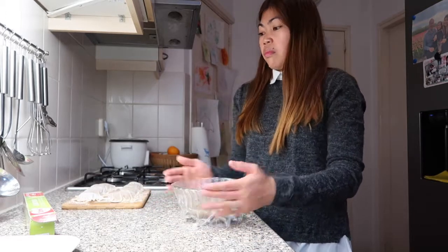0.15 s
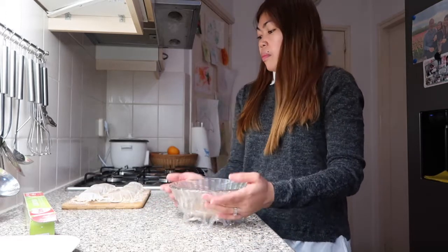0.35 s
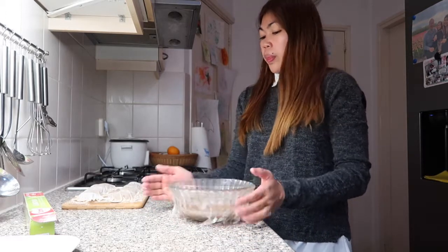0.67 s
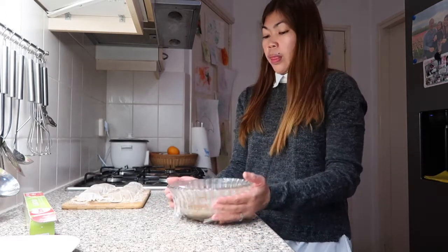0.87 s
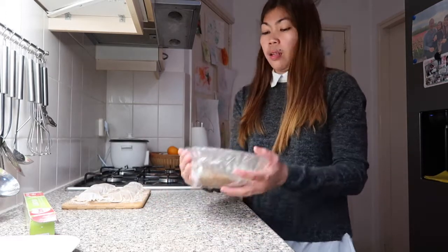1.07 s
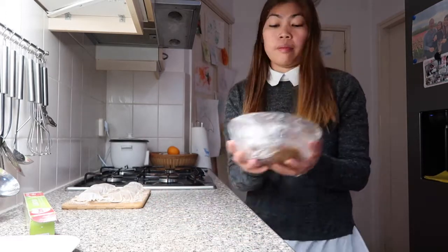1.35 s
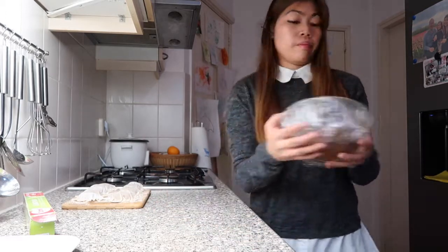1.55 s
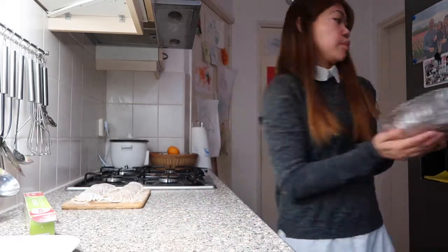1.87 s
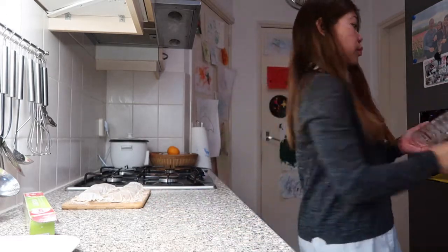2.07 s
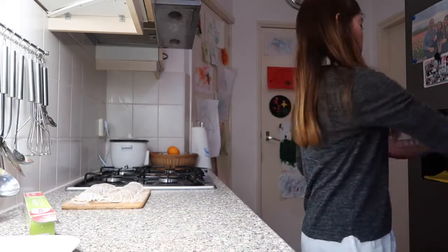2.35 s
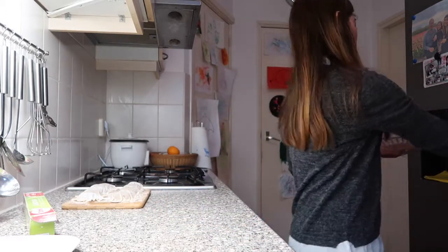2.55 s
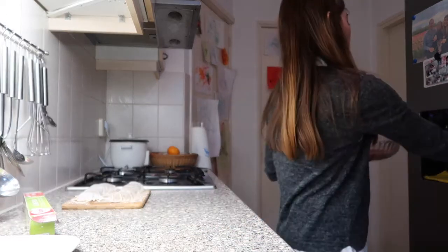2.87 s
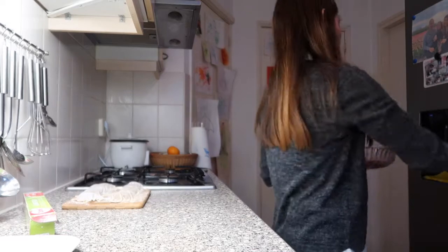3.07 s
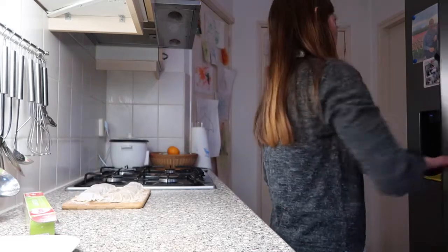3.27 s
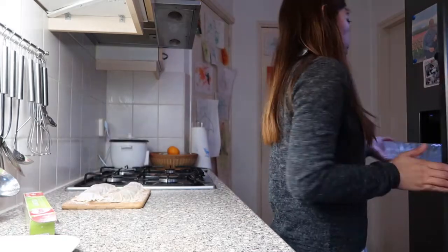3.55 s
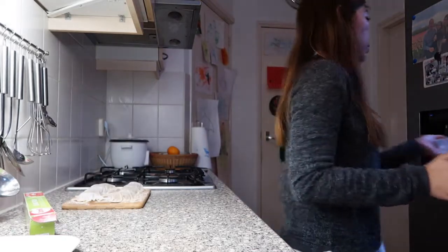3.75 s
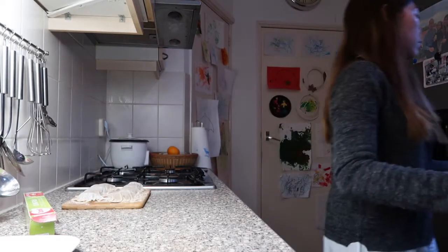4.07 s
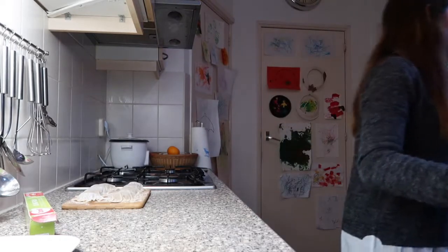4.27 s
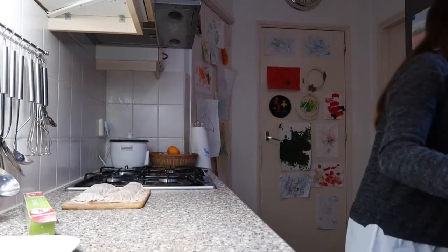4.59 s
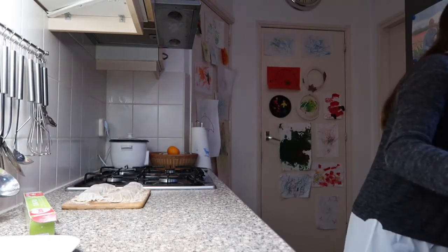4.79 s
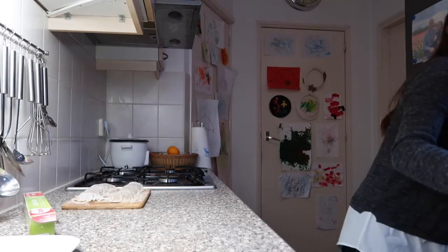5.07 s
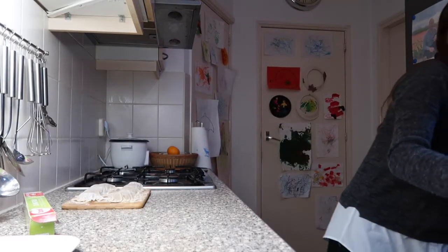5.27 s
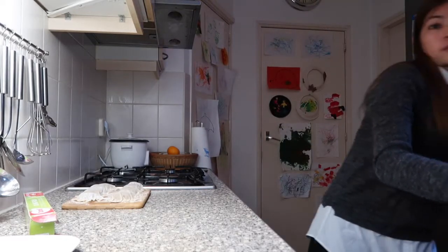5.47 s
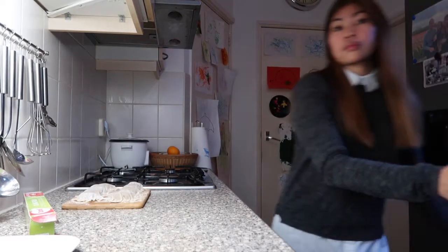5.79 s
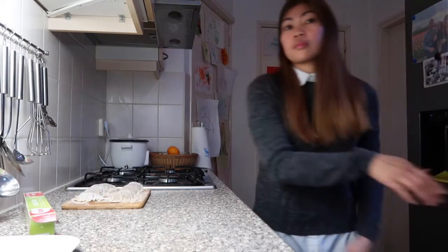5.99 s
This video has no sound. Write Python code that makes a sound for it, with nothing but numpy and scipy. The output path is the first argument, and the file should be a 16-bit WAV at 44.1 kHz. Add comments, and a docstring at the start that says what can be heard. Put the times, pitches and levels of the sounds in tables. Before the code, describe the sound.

Hard bowl taps in a tiled kitchen, then crinkling film, a tearing door seal with knocks and faint hinge groans, and a glassy shelf clatter.

```python
"""Bowl into the refrigerator

A film-covered glass bowl is tapped on a stone counter in a tiled kitchen and carried to the refrigerator: the
door seal tears and pops, dishes slide, and the bowl lands on a shelf and is pushed home. Blows are short bursts
ringing resonances or damped modes; film, clothes and air are swelling coloured noise; the hinge groans in narrow
bands. A hum lies under it all, and blows, snaps and seal echo in the room around a close microphone pair."""
import sys
import numpy as np
from scipy import signal
from scipy.fft import rfft, irfft, next_fast_len
from scipy.io import wavfile
from scipy.ndimage import map_coordinates

SR = 44100
rng = np.random.default_rng(int(sys.argv[2]) if len(sys.argv) > 2 else 0)


def store_wav(level_fs):
    """Save 16-bit WAV to argv[1]."""
    pcm = np.round(np.clip(np.atleast_2d(level_fs), -1, 1) * 32767)
    wavfile.write(sys.argv[1], SR, pcm.T.astype(np.int16))


N = 270333

# Refrigerator hum over time. Each row: time in seconds, level in dB.
HUM_LEVEL = [(0, -56), (.6, -51), (1.05, -74.5), (1.2, -58.5), (1.55, -59), (1.65, -54.5), (1.95, -52),
             (2.25, -48.5), (2.7, -50), (3.1, -44), (3.5, -48.5), (3.8, -47.5), (3.9, -50), (4.2, -46),
             (4.3, -49.5), (4.75, -48.5), (5.3, -53), (5.7, -48.5), (6.13, -49.5)]
# Colours of noise. Each row: frequency in Hz, relative level in dB.
MOTOR_COLOUR = [(41, -31.5), (70, -28.5), (80, -3), (92, -7), (108, 7.5), (157, -6.5), (177, -4.5),
                (220, -8), (290, -51.5), (480, -120)]
AIR_COLOUR = [(15, -37), (25, -11.5), (111, -5), (481, -17), (658, -30), (790, -13), (1050, -29),
              (2140, -17), (9240, -32.5), (13000, -42.5), (16900, -106), (22000, -120)]  # quiet of the room
HISS_COLOUR = [(880, -15.5), (1500, -4.5), (2900, -8), (3350, -11), (3640, -9), (4810, -18), (7420, -16),
               (11400, -17), (13000, -3.5), (16900, -36), (22000, -120)]  # microphones
SLIDE_COLOUR = [(100, -48), (180, -18.5), (250, -1.5), (450, 2), (700, -9), (1000, -14), (2000, -120)]  # sliding dishes, and the murmur above the hum
SCRAPE_COLOUR = [(450, -44.5), (700, -0.5), (1100, -4.5), (1600, -4), (2300, -12.5), (4000, -120)]
RUSTLE_COLOUR = [(1000, 0), (1600, 1.5), (2500, 6), (3500, -1.5), (5000, -38.5), (8000, -120)]
CRISP_COLOUR = [(2200, -37.5), (3500, -0.5), (4300, -2), (7000, -10), (9000, -28.5), (14000, -120)]
SIZZLE_COLOUR = [(5000, -7.5), (7000, -5.5), (9000, -6.5), (11500, -16.5), (13500, -29), (20000, -120)]
PUSH_COLOUR = [(12, -39.5), (20, -10.5), (43, -0.5), (80, 5.5), (100, -36.5), (180, -120)]  # pushed air, and the rumble below the hum
CLATTER_COLOUR = [(25, -55), (60, -40), (200, -13), (700, -10), (1500, -11.5), (3000, -15.5), (5000, -26.5),
                  (8500, -42), (11000, -103)]  # loose things on the shelf, before the tilt for hardness
RUMBLE_DB, MURMUR_DB = -12, -6  # against the motor noise
AIR_DB, HISS_DB = -59, -64

# Bowl on the counter, door with its load, palms on the bowl.
# Each row: start in seconds, peak level in dB, contact hardness in dB (brightness against 1500 Hz).
BOWL_TAPS = [(-.045, -8.5, 5.5), (-.004, -13.5, -0.5), (.021, -18.5, -1), (.302, -34, -1),
             (.315, -30.5, -4), (.332, -32.5, -2.5), (.346, -34, -3), (.626, -9, -15.5), (.6412, -2, 1.5),
             (.671, -12.5, -8), (.692, 0, 2), (.7075, -23.5, -7), (.728, -5.5, 4.5), (.739, -16.5, -1.5),
             (.748, -22, -2), (.769, -27.5, 7.5), (.819, -39, -18), (.795, -25, -3), (.855, -26, -7.5),
             (.889, -21.5, -12), (.92, -31, 1)]
DOOR_KNOCKS = [(2.17, -38, -7), (2.3, -49, 11), (2.424, -35, -5), (2.608, -37, -7), (2.734, -18, 12),
               (2.759, -22.5, -4), (2.791, -28, -3), (2.822, -8.5, 6), (2.827, -11, 11.5),
               (2.831, -7.5, 10), (2.845, -25, 4), (2.856, -13, 2), (2.874, -29, 1), (2.888, -15, -0.5),
               (2.905, -19, -6), (2.919, -32, -5), (2.959, -23, -3), (3.007, -32, -8), (3.877, -25.5, -0.5),
               (3.888, -27, -10), (3.904, -35.5, -8), (3.924, -40, 0), (3.977, -31, -5), (4.003, -26.5, -3),
               (4.735, -44, -26), (5.675, -32, -2)]
PALM_PATS = [(.228, -36.5, -23), (.449, -30.5, -16), (.482, -31, -17.5), (.505, -40, -15.5)]
# Resonant bodies. Each row: centre in Hz, width in Hz, relative level in dB.
COUNTER_BODY = [(115.7, 9.3, 13), (168, 78, 0.5), (337, 25, 4.5), (452, 12, 4.5), (513, 85, 5.5),
                (520, 2.8, 6), (571, 27, 1), (618.5, 42, 9), (653, 35, 6), (765, 66, 5.5), (930, 91, 2.5),
                (1036, 144, 3), (1472, 190, 1), (2060, 190, -3), (2400, 190, -6), (3610, 860, -5)]  # bowl and slab
PADDED_BODY = [(118.2, 22, 14), (189, 55, 1), (330, 80, 2.5), (500, 90, -8), (685, 120, -8)]  # bowl and slab under the palms
PANEL_BODY = [(61.6, 5.6, 9.5), (119, 36, 12), (321, 43, 4), (410, 38, 8), (717, 350, 5), (1104, 220, 9.5),
              (1437, 166, 11), (1900, 120, 7), (2440, 610, 2)]  # door panel
REBOUND_S, REBOUND = 0.00424, 0.35  # the far rim lands after the near one: delay, gain
RADIATES_HZ = 45  # blows give little sound below this

# Dishes and door seal rubbing.
# Each row: time at full strength in seconds, rise in seconds, hold in seconds, sliding in dB, scrape in dB.
RUBS = [(.12, 0.066, 0.03, -46.5, -76), (.32, 0.11, 0.029, -43.5, -52.5), (.48, 0.17, 0.18, -61, -66),
        (.97, 0.44, 0.012, -53.5, -52.5), (1.27, 0.15, 0.028, -75, -58.5), (1.66, 0.083, 0.12, -55.5, -66),
        (2.16, 0.21, 0.078, -58, -67), (2.31, 0.088, 0.05, -71, -49.5), (2.405, 0.023, 0.025, -54, -47.5),
        (2.44, 0.058, 0.013, -47, -61), (2.6, 0.11, 0.039, -52, -48), (2.66, 0.011, .05, -52, -42.5),
        (2.74, 0.034, 0.015, -33.5, -35), (2.8, 0.019, 0.047, -30, -28.5), (3.04, 0.11, 0.3, -53.5, -53),
        (3.25, 0.16, 0.32, -60.5, -62.5), (3.9, 0.041, 0.085, -44, -62), (4.02, 0.048, 0.12, -50.5, -42),
        (4.33, 0.7, 0.038, -51, -48), (4.65, 0.3, 0.064, -74, -55.5), (4.95, 0.11, 0.0087, -60, -50),
        (5.27, 0.15, 0.055, -47, -45), (5.55, .1, 0.027, -60, -51), (5.68, 0.022, 0.18, -51, -52),
        (5.94, 0.19, 0.19, -57, -60.5)]
# Film and wool in the hands. Each row: time at full strength in seconds, rise in seconds, hold in seconds,
# rustle in dB, drive of the crisp part in dB (before its mix), sizzle in dB.
RUSTLES = [(.27, 0.11, 0.11, -66, -71.5, -59), (.46, 0.22, 0.057, -44, -50, -51),
           (.61, 0.066, 0.24, -49, -57.5, -74), (.98, 0.033, 0.073, -73, -66, -66.5),
           (1.27, 0.11, 0.05, -55.5, -55.5, -60), (1.62, 0.064, 0.22, -55, -58, -70.5),
           (1.85, 0.7, 0.03, -58, -53, -61.5), (2.03, 0.22, 0.19, -51.5, -57, -66),
           (2.42, 0.28, 0.013, -50, -54.5, -66), (2.66, 0.008, 0.15, -45.5, -67, -73),
           (2.79, 0.21, 0.1, -40, -45, -66.5), (3.05, 0.57, 0.073, -51.5, -57, -70),
           (3.3, 0.94, 0.21, -63, -66.5, -75.5), (3.745, 0.0069, 0.032, -48.5, -60.5, -75),
           (3.91, 0.14, 0.022, -48, -65, -70), (3.99, 0.021, .03, -44, -45.5, -69),
           (4.05, 0.094, 0.066, -40, -41, -72), (4.21, .02, .04, -49, -51.5, -67),
           (4.32, 0.066, 0.13, -53.5, -50.5, -70), (4.635, 0.01, 0.092, -58, -60, -77),
           (4.93, 0.019, 0.13, -50, -52.5, -94.5), (5.29, 0.17, 0.036, -40, -43, -54),
           (5.46, 0.066, 0.0075, -43, -40.5, -46.5), (5.52, 0.23, 0.0059, -59, -68, -104.5),
           (5.7, 0.038, 0.022, -51.5, -48.5, -62), (5.81, 0.053, 0.0063, -42, -40.5, -59.5)]
# Air moved by door and body.
# Each row: time at full strength in seconds, rise in seconds, hold in seconds, level in dB.
PUSHES = [(.62, 0.08, 0.14, -53), (1.66, 0.12, 0.066, -55), (2.76, 0.11, .04, -42), (2.88, .1, 0.024, -33),
          (3.08, .1, 0.021, -45), (3.88, 0.025, 0.059, -42), (5.68, .08, 0.038, -50)]
RISE_DB, FADE_DB_PER_S = 19, 108  # of a movement: climb over its rise, loss after its hold
# Film creases: rate, middle pitch, life, level against the drive of the crisp part.
CRINKLES_PER_S, CRINKLE_HZ, CRINKLE_CYCLES, CRINKLE_DB = 600, 3740, 10, -7.5

# Snaps of film and plastic.
# Each row: start in seconds, peak level in dB, centre in Hz, fizz in dB against the resonance.
SNAPS = [(0.2141, -33.5, 2440, -3), (.234, -28, 2680, 18), (0.342, -39.5, 2800, -15),
         (.536, -28, 2890, 2.5), (0.623, -31, 2450, -5), (1.043, -46, 2480, 22), (1.57, -44, 2260, -7),
         (1.695, -21, 2370, 29), (1.731, -46, 1570, -4), (2.014, -38.5, 2440, -17.5), (2.553, -41, 5170, 4),
         (2.575, -42, 4640, -12), (2.653, -27.5, 1890, -2.5), (2.706, -30, 1280, -14),
         (3.7419, -33.5, 2020, -9.5), (3.845, -37.5, 3870, -15), (3.982, -40.5, 2980, -6.5),
         (4.037, -30, 3600, -19), (4.071, -26, 2750, -16.5), (4.117, -27.5, 3500, -13.5),
         (4.211, -26.5, 3730, -7.5), (4.305, -30.5, 2990, -9), (4.315, -31.5, 3800, -20.5),
         (4.623, -36, 1730, -1), (4.634, -42, 2610, -12), (4.924, -35, 3600, -9.5), (5.682, -26, 2400, 25),
         (5.803, -39.5, 3000, -29)]
SNAP_T60_S, CRACKLE_DB = 0.024, -29  # crackle after the click: decay, level before a gain of 2.66

# The hinge groans as the door swings. Each row: time at full strength in seconds, rise in seconds,
# hold in seconds, level in dB, pitch at full strength in Hz.
GROANS = [(2.301, .04, 0.042, -51, 1230), (2.355, .02, .015, -50, 1480), (2.402, .015, .04, -50, 1450),
          (2.428, .03, .03, -55, 1940), (2.62, 0.028, .02, -43.5, 549), (3.028, 0.025, 0.023, -38.5, 695),
          (3.101, 0.06, 0.02, -44, 747), (3.166, .03, .02, -49, 757), (3.214, 0.027, 0.08, -51, 998),
          (3.237, .04, 0.077, -53, 753), (3.25, .03, .05, -62, 1014), (3.308, .03, .03, -54, 692),
          (3.35, 0.041, 0.043, -52.5, 817), (3.367, 0.044, 0.024, -53.5, 1016),
          (3.905, .02, 0.024, -45.5, 880)]
GLIDE_HZ_PER_S, GROAN_FADE_DB_PER_S = 47, 279

# The door seal tears free.
# Each row: time at full strength in seconds, rise in seconds, hold in seconds, relative level in dB.
TEARS = [(2.66, .006, .04, -21), (2.735, .02, .03, -14.5), (2.8, .03, .02, -2.5), (2.83, .01, .07, -1)]
# Peak level, rate, scatter of size, brightness.
TEAR_DB, RIPS_PER_S, RIP_SPREAD_DB, RIP_TOP_HZ = -21.5, 650, 6.5, 3410

# Bowl on the shelf. Each row: start in seconds, peak level in dB, contact hardness in dB,
# cabinet boom in dB over that peak, share of the free ringing time that the hand leaves,
# rise time constant in seconds, clatter in dB before the whole is set to its peak.
LANDINGS = [(5.0352, -4.5, 1.5, -4, 0.56, 0.00055, 0.5), (5.052, -7, 0, -16, 0.42, 0.0011, -6),
            (5.08, -18.5, -9, 1, 0.59, .001, 11), (5.099, -19, -8.5, -2.5, 0.58, 0.00069, 4),
            (5.13, -16.5, -5.5, -2.5, 0.52, 0.0035, -2), (5.149, -16, -4, -28, 0.91, 0.0028, 3),
            (5.408, -18, -2, -5, 0.38, 0.0048, -0.5), (5.432, -21, 5, 3, 0.55, 0.0048, 4),
            (5.459, -22, -7.5, -6, 0.46, 0.0043, -7.5), (5.507, -33, 24, 5, 0.28, 0.0024, -5)]
# Ringing modes. Each row: pitch in Hz, middle strength in dB, free 60 dB decay time in seconds.
SHELF_MODES = [(437, -14, 0.75), (511.3, -4.5, 0.5), (620, -5.5, 0.15), (722, -3, 0.2), (823, -13.5, 0.6),
               (851, -11.5, 0.44), (965, -13, 0.47), (1110, -14, 0.18), (1287, -7.5, 0.24),
               (1360, -16, 0.55), (1452, -7, 0.31), (1476, -7.5, 0.21), (1792, -16, .25),
               (1840, -5.5, 0.52), (2160, -16, 0.26), (2403, -7, 0.16), (2460, -12, 0.35),
               (2663, -14, 0.23), (2980, -8, 0.2), (3040, -17, .12), (3540, -25, 0.17)]
CABINET_MODES = [(87, -1.5, 0.77), (144, -1, 0.22), (156, 1.5, 0.33), (182.8, 6, 0.27), (194.9, 2, .3),
                 (235, -7, 0.34)]
WANDER, WANDER_PER_S = .35, 30  # loose contents unsettle the ring: radians a step, steps a second

# Echo of the kitchen. Each row: frequency in Hz, 60 dB decay time in seconds.
KITCHEN = [(80, 0.57), (300, 0.34), (1200, 0.51), (4000, 0.41), (10000, 0.27)]
# Stereo width. Each row: frequency in Hz, gain of the side signal in dB.
BLOW_WIDTH = [(60, -58.5), (200, -45), (400, -25.5), (700, -27.5), (1200, -19), (2100, -20), (3800, -7),
              (7000, 2), (12000, 16.5)]
NEAR_WIDTH = [(60, -52), (200, -23), (400, -19.5), (700, -23.5), (1200, -16.5), (2100, -21.5), (3800, -5.5),
              (7000, 1), (12500, 18)]  # handling and snaps
BACKGROUND_WIDTH = [(60, -52.5), (110, -23.5), (200, -6), (360, -3), (640, -6.5), (1170, 4.5), (2110, -32),
                    (3830, -3), (6930, -2.5), (12500, -2)]
# Upper band limits. Each row: limit in Hz, for mid and then side.
TOP_HZ = [
    [13140],
    [15600],
]


def amp(db):
    """dB to gain."""
    return 10 ** (np.asarray(db) / 20)


def unit(x):
    """Scaled to rms 1."""
    return x / np.sqrt(np.mean(x ** 2) + 1e-20)


def along(points, hz):
    """Reads (Hz, value) points on a log frequency axis."""
    f, v = np.transpose(points)
    return np.interp(np.log(hz + 1), np.log(f + 1), v)


def curves(rows):
    """One value per sample for each column after the time."""
    s, *cols = np.vstack(rows).T
    return [np.interp(np.arange(N) / SR, s, c) for c in cols]


def wobble(rate):
    """A smooth random curve, rate knots a second."""
    knots = rng.standard_normal(int(N * rate / SR) + 4)
    return map_coordinates(knots, [np.arange(N) * rate / SR])


def filtered(x, response):
    """x shaped by a complex response of frequency."""
    m = next_fast_len(x.shape[-1] + 8192)
    spectrum = rfft(x, m) * response(np.fft.rfftfreq(m, 1 / SR))
    return irfft(spectrum, m)[..., :x.shape[-1]]


def high_pass(f, corner_hz):
    """First-order response that thins the bass below its corner."""
    return 1j * f / (corner_hz + 1j * f)


def resonances(peaks):
    """Causal response of (Hz, width, dB) resonances with alternating signs."""
    return lambda f: sum((-1) ** k * amp(db) * 1j * f * w / (c * c - f * f + 1j * f * w)
                         for k, (c, w, db) in enumerate(peaks))


def diffuse(spectrum, grain_db):
    """Two unrelated noises (mid, side) of one colour; grain makes their level crackle."""
    lumps = amp(grain_db * wobble(160) + 0.6 * grain_db * wobble(25))
    noise = lumps * rng.standard_normal((2, N))
    return unit(filtered(noise, lambda hz: amp(along(spectrum, hz))))


def kitchen_tail():
    """Tiled walls return a fresh noise tail (mid, side) that dies at its own pace in each band."""
    hz, t = np.fft.rfftfreq(256, 1 / SR), np.arange(SR // 256) * 128 / SR
    z = rng.standard_normal((2, len(hz), 2 * len(t))).view(complex)
    decay = amp(-60 * t / along(KITCHEN, hz)[:, None])
    tail = signal.istft(z * decay, SR, nperseg=256)[1]
    tail[:, :130] = 0  # the first wall answers after 3 ms
    return tail / np.linalg.norm(tail[0])


def add(out, s, db, sound, wet_db, aside=0.41):
    """Places one sound at its peak level, somewhat aside, followed by its echo."""
    tail = kitchen_tail()
    sound = amp(db) * sound / np.abs(sound).max()
    heard = amp(wet_db) * signal.fftconvolve(sound[None], tail, axes=1)
    quarter_late = signal.hilbert(sound, 2 * len(sound)).imag[:len(sound)]
    quarter_late = quarter_late * np.clip(np.arange(len(sound)) / 16, 0, 1)
    # the left port hears it later and softer
    heard[:, :len(sound)] += [sound, aside * quarter_late - .15 * sound]
    start = round(s * SR)
    heard = heard[:, max(-start, 0):N - start]  # a sound may have begun earlier
    out[:, max(start, 0):][:, :heard.shape[1]] += heard


def background():
    """The refrigerator's hum, with rumble below and murmur above, over the quiet of the room."""
    rumble = amp(RUMBLE_DB) * diffuse(PUSH_COLOUR, grain_db=-4.5)
    murmur = amp(MURMUR_DB) * diffuse(SLIDE_COLOUR, grain_db=-2.5)
    hum = diffuse(MOTOR_COLOUR, grain_db=3.0) + rumble + murmur
    return amp(curves(HUM_LEVEL)[0]) * hum + amp(AIR_DB) * diffuse(AIR_COLOUR, grain_db=-2.5)


def hiss():
    """The microphones' own noise, placed only in their difference."""
    return amp(HISS_DB) * diffuse(HISS_COLOUR, grain_db=5.0) * [[0], [1]]


def contact(hard_db, decay_s):
    """Force of a blow: a short uneven burst, brighter for a harder contact."""
    t = np.arange(SR // 3) / SR
    burst = amp(-60 * t / decay_s) * (1 + 1.37 * rng.standard_normal(len(t)))
    corner_hz = 1500 * amp(hard_db)

    def colour(f):
        return high_pass(f, 60) ** 2 / (1 + 1j * f / corner_hz) ** 3 / (1 + (f / 9000) ** 4)

    return filtered(burst, colour)


def knocks(events, body, decay_s, click_db, wet_db, rebound):
    """Blows ring a damped body; a little of the contact is heard directly."""
    out = np.zeros((2, N))
    ring = resonances(body)

    def struck(f):
        again = rebound * np.exp(-2j * np.pi * f * REBOUND_S) / (1 + 1j * f / 900)
        return (ring(f) + amp(click_db)) * (1 + again)

    for s, db, hard_db in events:
        add(out, s, db, filtered(contact(hard_db, decay_s), struck), wet_db)
    return out


def bowl():
    """Glass on stone: each blow rings bowl and slab, and the far rim follows duller and softer."""
    return knocks(BOWL_TAPS, COUNTER_BODY, decay_s=0.0014, click_db=-17.5, wet_db=-5.0, rebound=REBOUND)


def swell(s, rise, hold, fade):
    """Gain of one movement: a steady climb in dB, a hold, a steady fade."""
    t = np.arange(N) / SR - s
    return amp(RISE_DB * np.minimum(t, 0) / max(rise, .005) - fade * np.maximum(t - hold, 0))


def swells(rows):
    """Movements add in power; one gain per sample for each level column."""
    power = sum((amp(db)[:, None] * swell(s, rise, hold, FADE_DB_PER_S)) ** 2
                for s, rise, hold, *db in rows)
    return np.sqrt(power)


def rubbing():
    """Dishes and seal rub: grainy noise, low for sliding and higher for scraping."""
    slide, scrape = swells(RUBS)
    return slide * diffuse(SLIDE_COLOUR, grain_db=3.5) + scrape * diffuse(SCRAPE_COLOUR, grain_db=2.0)


def crinkles():
    """Tiny creases popping at random, each a few cycles at its own pitch."""
    draw = rng.random((int(CRINKLES_PER_S * N / SR), 4))
    hz = CRINKLE_HZ * 2 ** (1.1 * (draw[:, 1:2] - .5))
    t = np.arange(128) / SR
    strength = amp(-3 * np.log(draw[:, 2:3] + .02))
    envelope = t * hz * np.exp(-5 * t * hz / CRINKLE_CYCLES)
    grain = strength * envelope * np.sin(2 * np.pi * hz * t)
    at = (draw[:, :1] * N).astype(int) + np.arange(len(t))
    side_sign = np.sign(draw[:, 3:] - .5)
    mid, side = (np.bincount(at.ravel(), (grain * w).ravel(), N)[:N] for w in (1, side_sign))
    return unit(np.array([mid, side]))


def film():
    """Film and wool rustle: swelling noise in three colours, with popping creases in the crisp part."""
    rustle, crisp, sizzle = swells(RUSTLES)
    soft = rustle * diffuse(RUSTLE_COLOUR, grain_db=1.1)
    creased = 0.74 * diffuse(CRISP_COLOUR, grain_db=1.5) + amp(CRINKLE_DB) * crinkles()
    return soft + crisp * creased + sizzle * diffuse(SIZZLE_COLOUR, grain_db=2.0)


def snaps():
    """Stiff film lets go: a click and a short crackle around one broad resonance, with more or less fizz."""
    out, t = np.zeros((2, N)), np.arange(SR // 5) / SR
    fizz = resonances([(2500, 9000, 0)])
    for s, db, centre_hz, fizz_db in SNAPS:
        crackle = amp(CRACKLE_DB - 60 * t / SNAP_T60_S) * 2.66 * rng.standard_normal(len(t))
        burst = (t == 0) + crackle
        body = resonances([(centre_hz, 1.01 * centre_hz, 0)])
        snap = filtered(burst, lambda f: body(f) ** 2 + amp(fizz_db) * fizz(f))
        add(out, s, db, filtered(snap, lambda f: 1 / (1 + 1j * f / 8000) ** 4), wet_db=9.5)
    return out


def palms():
    """Soft palms on the bowl: dull contacts ring bowl and slab under the hands."""
    return knocks(PALM_PATS, PADDED_BODY, decay_s=0.0031, click_db=-32, wet_db=-2, rebound=0)


def pushed_air():
    """Door and body displace air: swells of low noise."""
    push, = swells(PUSHES)
    return push * diffuse(PUSH_COLOUR, grain_db=-1.5)


def door():
    """Door and load knock: each contact rings the broad resonances of the panel."""
    return knocks(DOOR_KNOCKS, PANEL_BODY, decay_s=0.0028, click_db=-22.0, wet_db=0.55, rebound=0)


def hinge():
    """Stick-slip in the hinge: a narrow band of noise at the slip rate, which climbs as the door swings."""
    t, out = np.arange(N) / SR, 0
    a, b = wobble(120), wobble(120)
    for s, rise, hold, db, pitch_hz in GROANS:
        phase = 2 * np.pi * (pitch_hz + GLIDE_HZ_PER_S * (t - s) / 2) * (t - s)
        band = a * np.sin(phase) + b * np.cos(phase)
        out = out + amp(db) * swell(s, rise, hold, GROAN_FADE_DB_PER_S) * band
    return out


def seal():
    """The rubber lets go in uneven little rips that ring the door panel."""
    out, draw = np.zeros((2, N)), rng.random((int(RIPS_PER_S * N / SR), 3))
    size = amp(-RIP_SPREAD_DB * np.log(draw[:, 1] + 0.011)) * np.sign(draw[:, 2] - .5)
    rips = np.bincount((draw[:, 0] * N).astype(int), size, N) * swells(TEARS)[0]
    start = TEARS[0][0] - .05
    panel = resonances(PANEL_BODY[2:])

    def body(f):
        return (panel(f) + amp(-2.5)) * high_pass(f, 400) / (1 + 1j * f / RIP_TOP_HZ) ** 3

    torn = filtered(rips[round(start * SR):][:SR // 2], body)
    add(out, start, TEAR_DB, torn, wet_db=-4.0)
    return out


def ringing(modes, t, tilt_db, free, wander):
    """Damped modes at new strengths, their phases drifting at random; tilt is per octave."""
    hz, db, t60 = np.transpose(modes)[:, :, None]
    knots = np.cumsum(rng.standard_normal((len(modes), 64)), axis=1)
    drift = np.array([np.interp(t * WANDER_PER_S, np.arange(len(k)), k - k[0]) for k in knots])
    strength_db = db + rng.normal(0, 2.7, hz.shape) + tilt_db * np.log2(hz / 500)
    level_db = strength_db - 60 * t / (free * t60)
    return np.sum(amp(level_db) * np.sin(2 * np.pi * hz * t + wander * drift), axis=0)


def shelf():
    """The glass shelf rings over a loose clatter, and the cabinet booms under the weight."""
    out, t = np.zeros((2, N)), np.arange(SR // 2) / SR
    for s, db, hard_db, weight_db, free, rise, clatter_db in LANDINGS:
        def colour(hz):
            return amp(along(CLATTER_COLOUR, hz) + hard_db * np.log2((hz + 20) / 500) / 3)

        loose = amp(-60 * t / 0.23) * unit(filtered(rng.standard_normal(len(t)), colour))
        glass = ringing(SHELF_MODES, t, hard_db / 3, free, WANDER)
        landing = (glass + amp(clatter_db) * loose) * (1 - np.exp(-t / abs(rise)))
        add(out, s, db, landing, wet_db=-5, aside=1.0)
        boom = ringing(CABINET_MODES, t, 0, free, wander=0.22) * (1 - np.exp(-t / 0.024))
        add(out, s, db + weight_db, boom, wet_db=-11.5)
    return out


def widened(pair, width):
    """Keeps the mid and gives the side its gain at each frequency."""
    return filtered(pair, lambda hz: [np.ones_like(hz), amp(along(width, hz))])


def scene():
    """Mixes blows, handling and background, each with its own width, into left and right."""
    blows = bowl() + palms() + door() + seal() + shelf()
    blows = filtered(blows, lambda f: high_pass(f, RADIATES_HZ) ** 2)
    handling = film() + rubbing() + pushed_air() + hinge()
    near = widened(snaps() + handling, NEAR_WIDTH)
    mid, side = widened(blows, BLOW_WIDTH) + near + widened(background(), BACKGROUND_WIDTH) + hiss()
    return np.array([mid + side, mid - side]) * amp([[-.1], [.1]])


def record(dry):
    """Peaks are softly clipped; mid and side keep nothing above their band limits."""
    left, right = dry / (1 + np.abs(dry / .99) ** 8) ** (1 / 8)
    mid_side = np.array([left + right, left - right]) / 2
    mid, side = filtered(mid_side, lambda hz: hz < np.array(TOP_HZ))
    return np.array([mid + side, mid - side])


dry = scene()
out = record(dry)
store_wav(out)
```